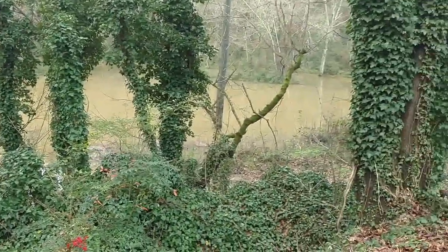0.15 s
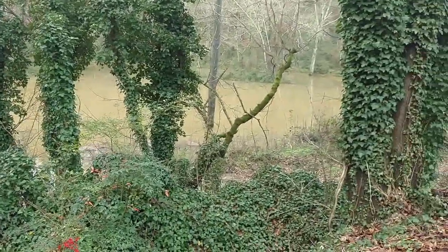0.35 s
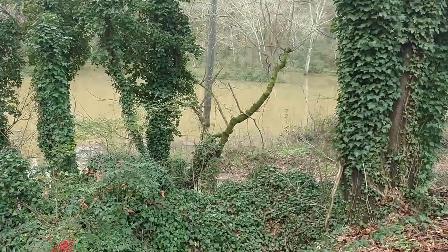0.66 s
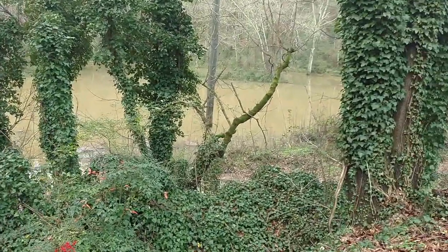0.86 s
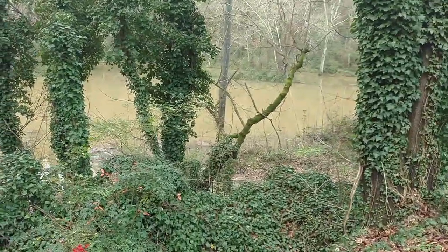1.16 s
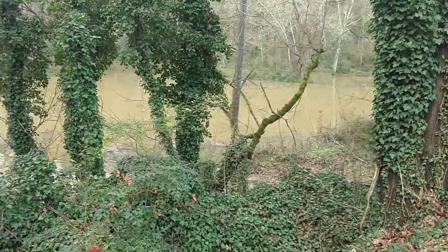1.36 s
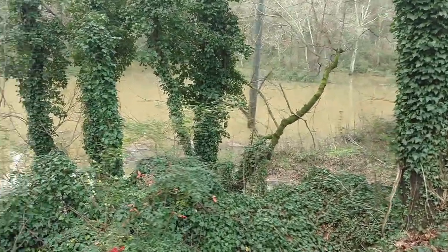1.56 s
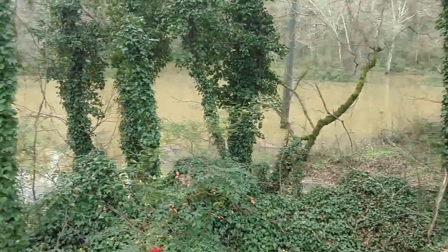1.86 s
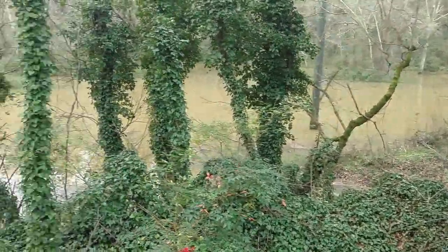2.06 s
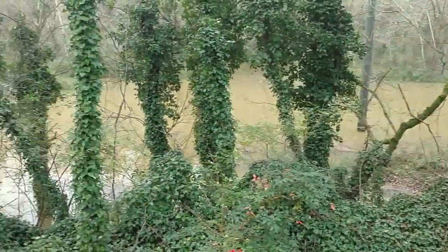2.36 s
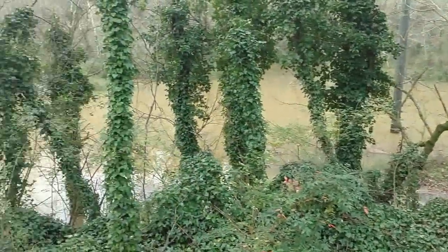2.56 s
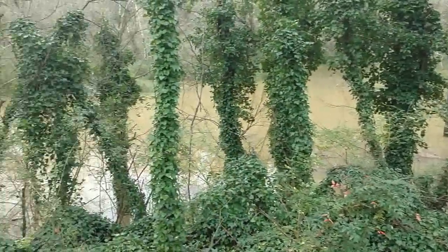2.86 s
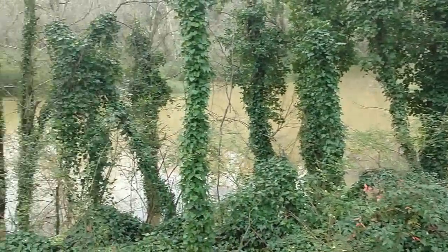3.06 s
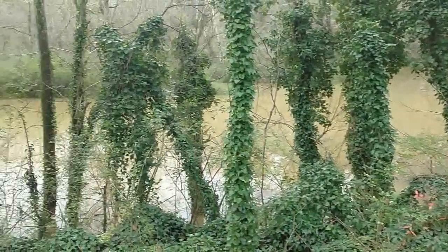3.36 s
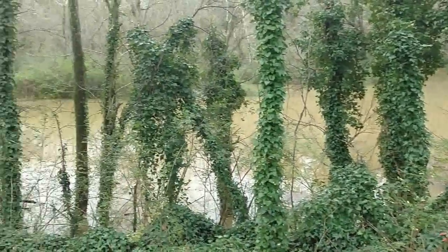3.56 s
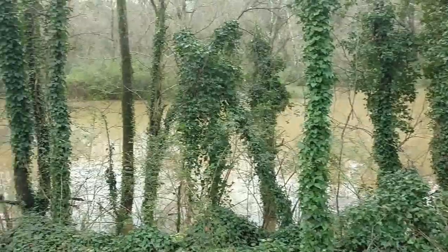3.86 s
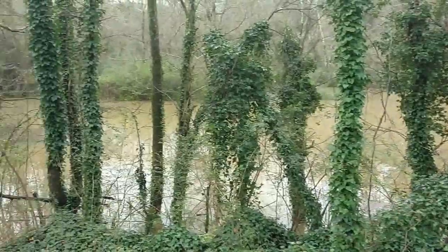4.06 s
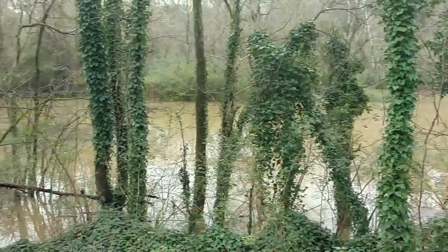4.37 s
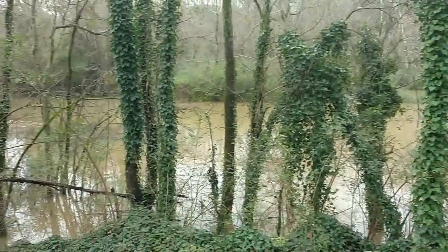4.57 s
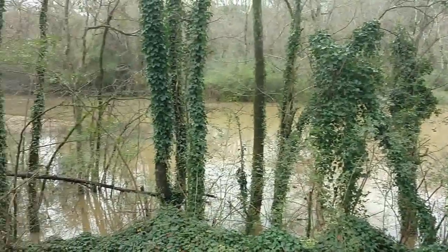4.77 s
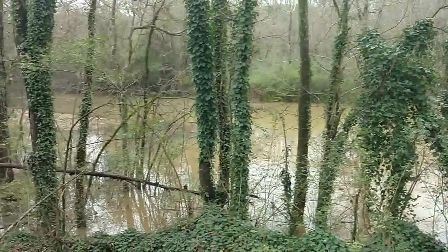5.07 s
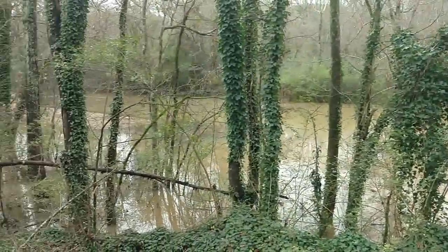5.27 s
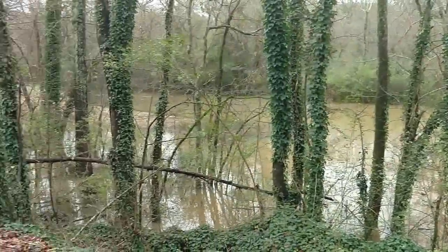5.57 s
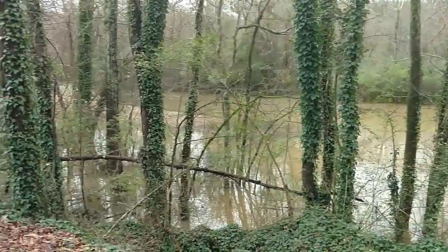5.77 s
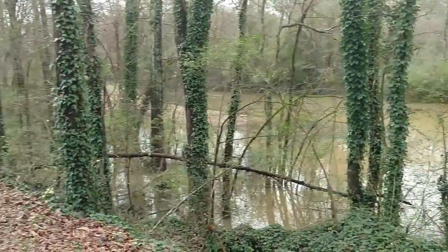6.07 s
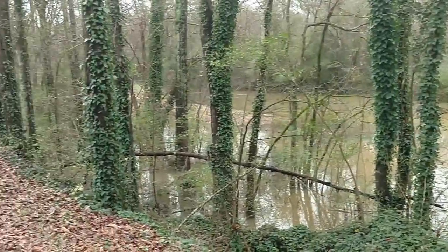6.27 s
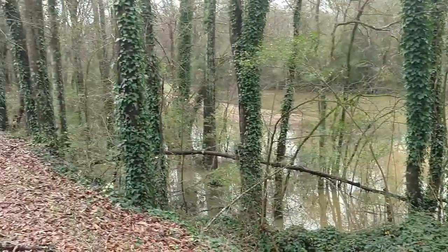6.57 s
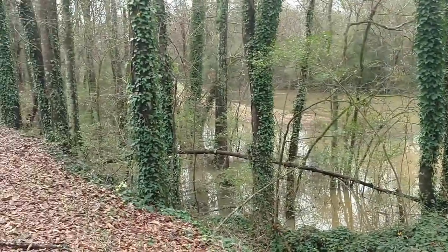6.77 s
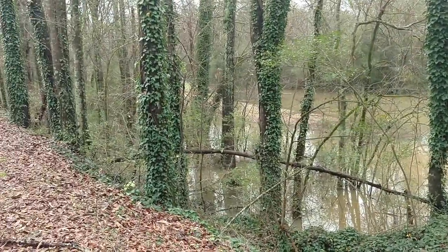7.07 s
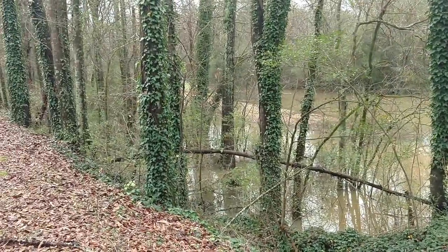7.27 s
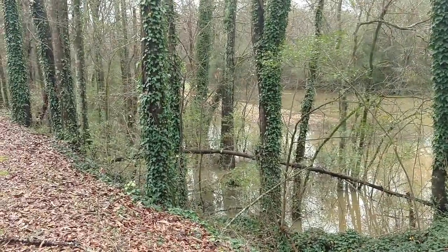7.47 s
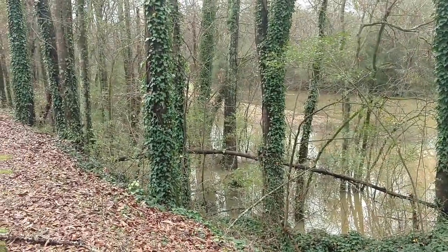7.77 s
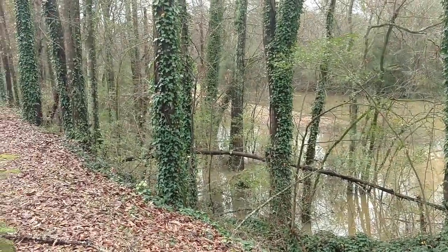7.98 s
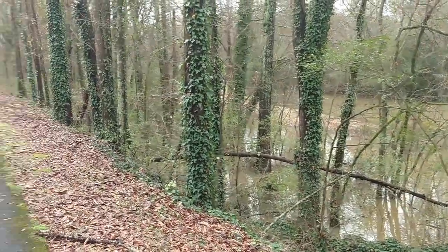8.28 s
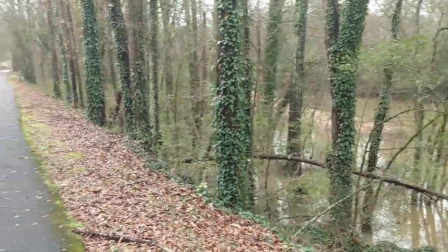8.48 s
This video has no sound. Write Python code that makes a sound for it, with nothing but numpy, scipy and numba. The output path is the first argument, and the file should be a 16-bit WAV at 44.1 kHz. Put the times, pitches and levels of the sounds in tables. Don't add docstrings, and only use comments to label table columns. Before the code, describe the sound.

A quiet distant frog chorus opens with a falling bird whistle. Near frogs begin pulsing trills, each climbing in pitch as it slows. A buzzing crow calls from a far tree with woodland echo, then stops while overlapping trills and single sharp frog pulses crowd in, loudest near the end. Faint hiss and far traffic lie underneath; fingers tap the hand-held phone in wide open-air stereo.

```python
import sys
import numpy as np
from scipy import signal
from scipy.fft import rfft, irfft
from scipy.io import wavfile
from scipy.ndimage import uniform_filter1d
from numba import njit

SR = 44100
rng = np.random.default_rng(int(sys.argv[2]) if len(sys.argv) > 2 else 0)


def volts_from_decibels(level):
    exponent = np.asarray(level, float) / 20
    return 10 ** exponent


def wav_out(sig):
    wavfile.write(sys.argv[1], SR, np.round(np.clip(np.atleast_2d(sig).T, -1, 1) * 32767).astype(np.int16))


N = 381024

# pitch_hz, level_db (per Hz), likeness (of the ports, 0-1)
AIR_SPECTRUM = [(28.6, -100, 0.22), (55.6, -78, 0.1), (103, -71, 0.33), (191.7, -70, 1), (330, -79.5, 0.69),
                (700, -83, 0.59), (1520, -85, 0.3), (2000, -86, 0), (4170, -87, 0.08), (4860, -96.5, 0.07),
                (8000, -103, 0), (10400, -108, 0), (15000, -113, 0.15), (16000, -130, 0.1)]
# start_s, level_db, middle_hz
FAR_CHORUS = [(0.0, -37, 3134), (0.38, -40, 2997), (0.749, -35.5, 3104), (1.28, -35.5, 3114),
              (1.71, -37.5, 3043), (2.79, -35, 2990), (3.01, -32, 3153), (3.37, -35.5, 3023),
              (3.97, -36, 3040), (5.34, -32.5, 3027), (6.06, -31.5, 3152), (6.3, -32, 3004),
              (6.71, -25.5, 3095), (6.95, -31.5, 3040), (7.46, -26.5, 3030), (7.72, -33, 3140),
              (7.97, -27.5, 3040), (8.23, -33, 3080)]
# time_s, left_lag_samples
PHONE_TURN = [
    (0, 11.6),
    (4, 12.4),
    (8.64, 15.24),
]
# start_s, length_s, first_pitch_hz, last_pitch_hz, level_db
BIRD_WHISTLES = [
    (0, 0.25, 5000, 4170, -62),
    (2.91, .04, 8400, 7800, -74),
    (3.58, 0.23, 6630, 7150, -61),
    (4.059, .045, 3920, 3940, -52),
    (6.605, 0.051, 4090, 3950, -48),
    (6.69, .085, 8730, 8160, -66),
    (6.73, 0.2, 4750, 4400, -54.5),
    (6.81, .09, 8000, 7550, -72),
]
# time_s, tick_peak_db, knock_peak_db
FINGER_TAPS = [(1.15, -58, -42.5), (4.358, -35, -30.5), (4.808, -34.5, -17), (5.409, -48, -45.5),
               (5.869, -46, -63), (6.145, -44, -42), (6.26, -44.5, -29.5), (6.283, -67.5, -45.5),
               (6.711, -40, -49.5), (7.679, -46.5, -42.5), (7.731, -52, -63), (8.244, -41.5, -56),
               (8.569, -43.5, -35), (8.637, -31, -51)]
# time_s, peak_db, pitch_hz, t60_s
CASE_BUMP = [
    (3.088, -33, 91, 0.087),
]
# last_pulse_s, slowest_gap_s, slow_pulses (count at the end)
TRILL_BEATS = [(2.2649, .043, 4), (2.5781, .051, 7), (3.2137, .055, 4), (3.2666, .0473, 6.9),
               (3.6268, .0495, 4.3), (3.7235, .0463, 3.9), (4.0199, .0455, 3.9), (4.397, .051, 3.3),
               (4.8629, .054, 4.6), (5.4855, .043, 6.5), (5.4915, .0483, 2.9), (6.1321, .0453, 6.3),
               (6.146, .051, 6), (6.163, .0568, 3.7), (6.7916, .0475, 5.8), (6.8165, .054, 4),
               (6.8444, .05, 7), (6.9392, .0558, 5.8), (7.5079, .046, 6.8), (7.516, .055, 3.5),
               (7.7364, .0578, 3.7), (8.0906, .048, 3.7), (8.1794, .0573, 3.9), (8.5625, .039, 5.1),
               (8.6094, .04, 5.5)]
# peak_db, last_pitch_hz
TRILL_VOICES = [(-30, 2920), (-29, 3040), (-25, 3220), (-24.5, 2920), (-26.5, 2760), (-23, 3240),
                (-27, 2960), (-22.5, 3030), (-28, 3150), (-28, 3240), (-25, 2720), (-26, 2760), (-23, 3220),
                (-11.5, 3140), (-26, 2780), (-20, 3020), (-18, 3240), (-22, 3000), (-21, 3020),
                (-14.5, 3260), (-12, 3090), (-20, 3150), (-20, 3000), (-22, 2970), (-19, 3000)]
# last_pulse_s, slowest_gap_s, slow_pulses
HIGH_TRILL_BEATS = [(3.1149, .052, 5), (6.3356, .0485, 3.3), (6.8405, .0508, 5.1), (7.55, .054, 3),
                    (8.2812, .0455, 3.8), (8.6074, .0498, 2)]
# peak_db, last_pitch_hz
HIGH_TRILL_VOICES = [(-30, 3600), (-24, 3740), (-23, 3580), (-29, 3650), (-20.5, 3710), (-24, 3400)]
# peak_s, peak_db, sac_pitch_hz
LONE_PULSES = [(2.797, -22, 2900), (2.9507, -16.5, 2954), (3.158, -23, 3204), (3.852, -21, 2810),
               (4.704, -18, 3020), (4.7565, -26, 3020), (4.8326, -20, 3130), (5.197, -21, 3050),
               (5.3931, -21, 3200), (5.4433, -22.5, 2940), (5.6115, -19, 3040), (6.182, -18.5, 3080),
               (6.3283, -26, 3120), (6.55, -18, 3040), (6.5994, -13.5, 3130), (6.6868, -19, 3080),
               (6.762, -17, 3020), (7.3368, -16.5, 3030), (7.4034, -18.5, 3230), (7.4387, -16, 2930),
               (7.7745, -13, 3160), (7.802, -19.5, 3060), (7.844, -15.5, 2990), (7.961, -21, 2970),
               (8.068, -18, 3200), (8.3176, -23, 3620), (8.5175, -17, 3070), (8.586, -14.5, 3080)]
# start_s, length_s, top_pitch_hz, last_pitch_hz, level_db
CROW_CAWS = [
    (3.66, .27, 725, 445, -35.5),
    (3.96, .095, 730, 700, -43),
    (4.068, .352, 752, 503, -30),
    (4.462, .458, 755, 480, -30.5),
    (5.075, .355, 680, 515, -28),
    (5.64, .34, 685, 435, -27),
]
# pitch_hz, width_hz, level_db
THROAT_RESONANCES = [
    (677, 92, 7),
    (1443, 474, 29.5),
    (1680, 300, -8),
    (2050, 200, -23.5),
]


def late(x, lag):
    phase = -2j * np.pi * np.arange(N // 2 + 1) * lag / N
    return irfft(rfft(x) * np.exp(phase), N)


def ports(x, lag, shade_db):
    return np.array([volts_from_decibels(shade_db) * late(x, lag), x])


def resonance(x, hz, width):
    return signal.lfilter(*signal.iirpeak(hz, hz / width, SR), x)


def walk(rate):
    k = int(SR / rate)
    held = np.repeat(rng.standard_normal(N // k + 1), k)
    return uniform_filter1d(uniform_filter1d(held, k), k)[:N]


def sung(table, gap):
    t = np.arange(N) / SR
    s, *columns = np.transpose(table)
    gate = np.clip(np.minimum(t - s[0], s[-1] - t) / gap + 1, 0, 1)
    return [np.interp(t, s, c) for c in columns], gate ** 2


@njit
def ring(at, hz, size, rise, under, over):
    out = np.zeros(N + 1024)
    for k in range(len(at)):
        first = int(max(at[k], 0.)) + 1
        for i in range(first, min(first + int(5 * rise[k]), N)):
            u = (i - at[k]) / rise[k]
            swell = size[k] * u ** 3 * np.exp(3 - 3 * u)
            turn = np.pi * hz[k] * (i - at[k]) / SR
            out[i] += swell * (np.sin(2 * turn) + under * np.sin(turn) + over * np.sin(3 * turn))
    return out[:N]


def frog_pulses(s, db, hz, lag, shade_db, rise_s):
    voice = (rise_s * SR, volts_from_decibels(-24), volts_from_decibels(-33))
    left = ring(s * SR + lag, hz, volts_from_decibels(db + shade_db), *voice)
    right = ring(s * SR, hz, volts_from_decibels(db), *voice)
    return np.array([left, right])


def air():
    hz, db, like = np.transpose(AIR_SPECTRUM)
    f = np.maximum(np.arange(N // 2 + 1) * SR / N, 1)
    shape = volts_from_decibels(np.interp(np.log(f), np.log(hz), db)) * np.sqrt(SR / 2)
    like = np.clip(np.interp(np.log(f), np.log(hz), like), 0, 1)
    same, left, right = rfft(rng.standard_normal((3, N)))
    shared = np.sqrt(like) * same * np.array([[volts_from_decibels(3.5)], [1]])
    separate = np.sqrt(1 - like) * np.array([volts_from_decibels(-4.0) * left, right])
    pair = shape * (shared + separate)
    hum = 1 / (1 + (f / 450) ** 2)
    swell = volts_from_decibels(1.2 * walk(1.5) + .8 * walk(9))
    flicker = volts_from_decibels(.6 * walk(4))
    return irfft(pair * hum, N) * swell + irfft(pair * (1 - hum), N) * flicker


def far_frogs(count=230, size=22):
    start = (np.arange(count) + rng.random(count)) * (N / SR + 1) / count - 1
    who = np.clip(rng.standard_normal((count, 4, 1)), -2, 2)
    step = np.arange(size) / size
    gaps = (.024 + .028 * step) * volts_from_decibels(1.3 * who[:, 0])
    s = start[:, None] + np.cumsum(gaps, axis=1)
    s = s + .0015 * rng.standard_normal(s.shape)
    time, level_db, mid_hz = np.transpose(FAR_CHORUS)
    hz = np.interp(s, time, mid_hz) * (1 + 0.041 * who[:, 1] + 0.15 * (step - .6))
    db = 0.54 * who[:, 2] + 5 * np.sin(np.pi * step ** 0.6) + 0.9 * rng.standard_normal(s.shape)
    lag = np.interp(s, *np.transpose(PHONE_TURN)) + 4.54 * who[:, 3]
    keep = (s > 0) & (s < N / SR)
    crowd = frog_pulses(s[keep], db[keep], hz[keep], lag[keep], -14.0, np.full(keep.sum(), .0019))
    t = np.arange(N) / SR
    end_db_per_s = 23.5
    level = np.interp(t, time, level_db) + end_db_per_s * np.maximum(t - time[-1], 0) - 1.5
    return crowd / crowd.std() * volts_from_decibels(level)


def whistle_shape(start, length, first_hz, last_hz, db, count=12):
    bend, arch, edge_db = .6, 0.017, -7.5
    u = np.linspace(0, 1, count)
    hz = (first_hz + (last_hz - first_hz) * u ** bend) * (1 + arch * np.sin(np.pi * u))
    return np.transpose([start + length * u, hz, db + edge_db * (2 * u - 1) ** 2])


def whistles():
    out = 0
    for note in BIRD_WHISTLES:
        (hz, db), gate = sung(whistle_shape(*note), .008)
        turn = 2 * np.pi * np.cumsum(hz) / SR
        octave = volts_from_decibels(-22 - .006 * (hz - 4001)) * np.sin(2 * turn)
        out = out + gate * volts_from_decibels(db + 3.0 + 2 * walk(40)) * (np.sin(turn) + octave)
    return ports(out, -3.5, 3.5)


def handling():
    tick, knock, t = np.zeros(N), np.zeros(N), np.arange(N) / SR
    for s, tick_db, knock_db in FINGER_TAPS:
        at = min(int(s * SR), N - 9)
        tick[at] = volts_from_decibels(tick_db)
        knock[at] = -volts_from_decibels(knock_db)
    s, db, hz, t60 = CASE_BUMP[0]
    since = np.maximum(t - s, 0)
    bump = volts_from_decibels(db) * np.sin(2 * np.pi * hz * since) * 1000. ** (-since / t60)
    bright = resonance(resonance(tick, 6900, 4100), 6900, 4100)
    brighter = resonance(resonance(tick, 11500, 6000), 11500, 6000)
    tick = 7 * bright + 1.7 * brighter
    knock = 9 * resonance(knock, 300, 1000)
    return ports(tick + knock + bump, 1.0, 2.5)


def trill(s, gap, slow, db, hz, count=14):
    fast_share, slowing_pulses = .6, 1.4
    climb_hz, swell_db, warm_up_db = 24.2, .3, 2.5
    k = np.arange(count)
    gaps = gap * (fast_share + (1 - fast_share) / (1 + np.exp((k - slow) / slowing_pulses)))
    time = s - np.cumsum(gaps) + gaps
    level_db = db - swell_db * k - warm_up_db * np.maximum(k - slow - 1, 0)
    return np.transpose([time, level_db, hz - climb_hz * k])


def near_frogs():
    beats = TRILL_BEATS + HIGH_TRILL_BEATS
    voices = TRILL_VOICES + HIGH_TRILL_VOICES
    trills = [trill(*beat, *voice) for beat, voice in zip(beats, voices)]
    s, db, hz = np.vstack(trills + [LONE_PULSES]).T
    chance = rng.standard_normal((len(s), 4)).T
    lag = np.interp(s, *np.transpose(PHONE_TURN)) + 1.3 * chance[0]
    vary = volts_from_decibels(1.1 * np.clip(chance[1], -1.5, 2))
    hz = np.maximum(hz, 2600) + 45 * chance[2]
    rise_s = 0.0026 * (3100 / hz) ** 2.3 * vary
    db = db + 0.83 + .8 * chance[3]
    return frog_pulses(s - rise_s, db, hz, lag, -3.5, rise_s)


def caw_shape(start, length, top_hz, last_hz, db, count=40):
    rise_s, fall_s, dip_s = .068, .075, 0.072
    start_share, fall_share = .75, .25
    attack_db, dip_db = -14, -10
    push_db, push_s, push_width_s = 2.5, .26, 0.039
    release_db, release_s = -5, 0.05
    upper_db, upper_lift_db = -27.5, 6.5
    half_start, half_per_s = .15, 2.5
    t = np.linspace(0, length, count)
    after = np.maximum(t - rise_s, 0)
    rise = np.sin(np.pi / 2 * np.minimum(t / rise_s, 1))
    fall = 1 - np.exp(-(after / fall_s) ** 1.5)
    hz = top_hz * (start_share + (1 - start_share) * rise - fall_share * fall)
    hz = hz + (last_hz - hz[-1]) * (t / length) ** 2
    push = np.exp(-((t - push_s) / push_width_s) ** 2)
    dip = 1 - np.exp(-(after / dip_s) ** 2)
    level_db = db + attack_db * (1 - rise) + dip_db * dip + push_db * push
    level_db = level_db + release_db * np.maximum(1 - (length - t) / release_s, 0)
    half = np.clip(half_start + half_per_s * (t - 2 * rise_s) * fall, 0, 1)
    return np.transpose([start + t, hz, level_db, upper_db + upper_lift_db * fall, half])


def crow():
    out = 0
    for caw in CROW_CAWS:
        (hz, db, top_db, half), gate = sung(caw_shape(*caw), 0.0035)
        shaky_hz = uniform_filter1d(hz, size=1300) * (1 + .045 * walk(200))
        turn = 2 * np.pi * np.cumsum(shaky_hz) / SR
        throb = 1 + 0.29 * np.sin(2 * np.pi * np.cumsum(74 + 9 * walk(30)) / SR)
        throb = throb * (1 + half * np.cos(turn / 2))
        overtones = sum(np.cos(k * turn) for k in range(1, 15))
        buzz = throb * overtones + (.8 + 2.2 * half) * rng.standard_normal(N)
        low = sum(volts_from_decibels(d) * resonance(resonance(buzz, f, w), f, w) for f, w, d in THROAT_RESONANCES)
        low = low / np.sqrt(uniform_filter1d(low ** 2, size=2500))
        top = resonance(buzz + 2.5 * throb * rng.standard_normal(N), 4640, 1100)
        out = out + gate * volts_from_decibels(db - 4.5) * (low + volts_from_decibels(top_db) * top)
    return ports(out, -2.1, -0.87)


def wood(x, count=4):
    t60_s, left_db, right_db = .7, -6.5, -4
    t = np.arange(SR) / SR
    decay = 1000. ** (-t / t60_s) * np.minimum(t / 0.0008, 1)
    tail = rng.standard_normal((count, 2, SR)) * decay
    tail[:, 0] = .6 * tail[:, 0] + .55 * np.roll(tail[:, 1], 12, axis=1)
    tail = tail / np.sqrt(np.sum(tail ** 2, axis=2, keepdims=True))
    turn = np.arange(N) / SR * 2 / count
    echoes = 0
    for k in range(count):
        away = abs((turn - k / count + .5) % 1 - .5) * count
        weight = np.cos(np.pi / 2 * np.clip(away, 0, 1))
        echoes = echoes + signal.fftconvolve(x[1:] * weight, tail[k], axes=1)[:, :N]
    return volts_from_decibels(np.array([[left_db], [right_db]])) * echoes


def scene():
    hush, far, birds, taps = air(), far_frogs(), whistles(), handling()
    near, caws = near_frogs(), crow()
    echoes = wood(volts_from_decibels(-6) * near + far + volts_from_decibels(5.0) * caws + volts_from_decibels(2.5) * birds)
    return near + far + caws + birds + echoes + taps + hush


def band_limit(x):
    return signal.sosfilt(signal.butter(12, 15400, fs=SR, output="sos"), x)


def record(dry):
    port_mix, port_gap = 0.5, 17.2
    aimed = dry - port_mix * late(dry[::-1], port_gap)
    return band_limit(aimed)


dry = scene()
out = record(dry)
wav_out(out)
```